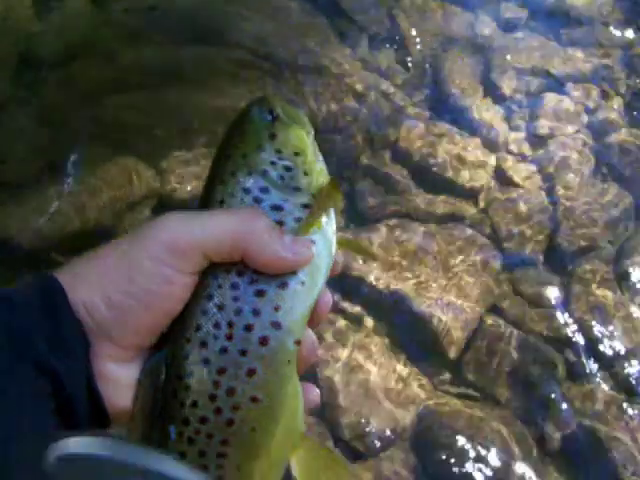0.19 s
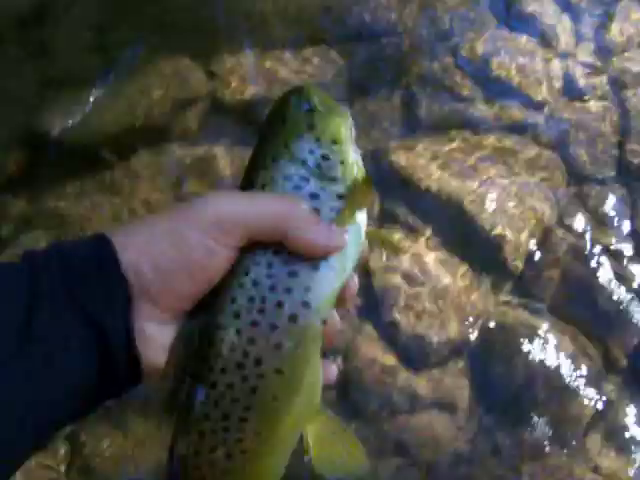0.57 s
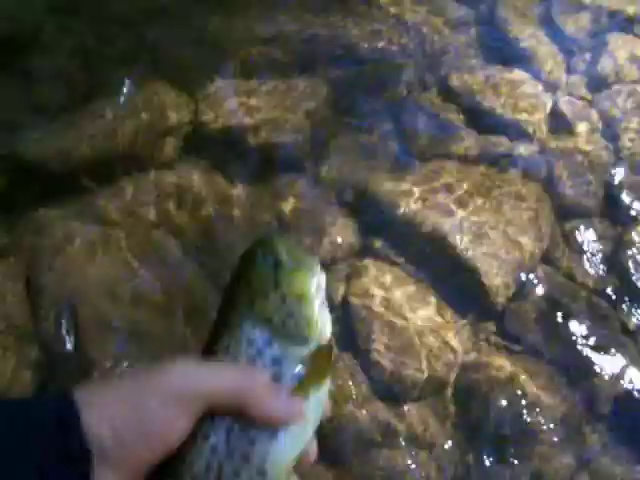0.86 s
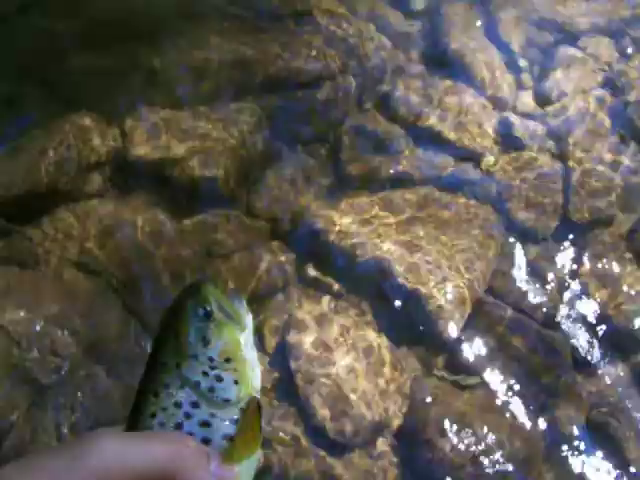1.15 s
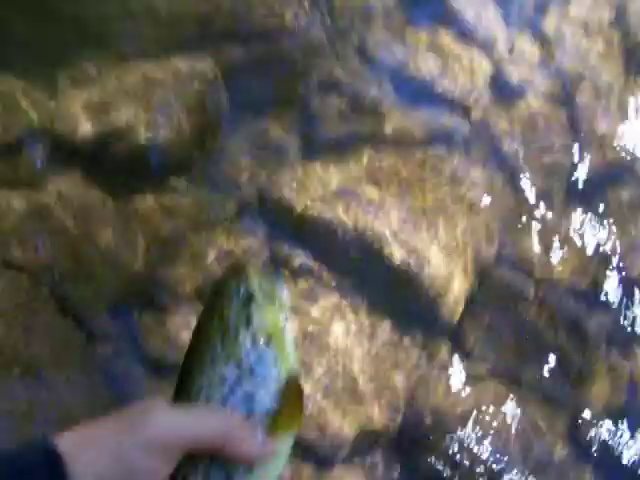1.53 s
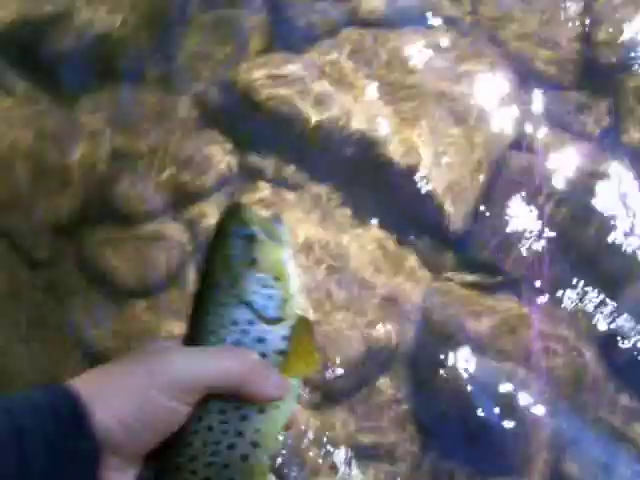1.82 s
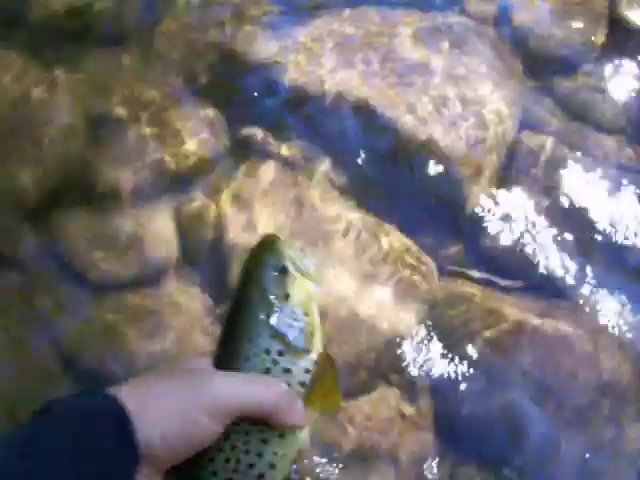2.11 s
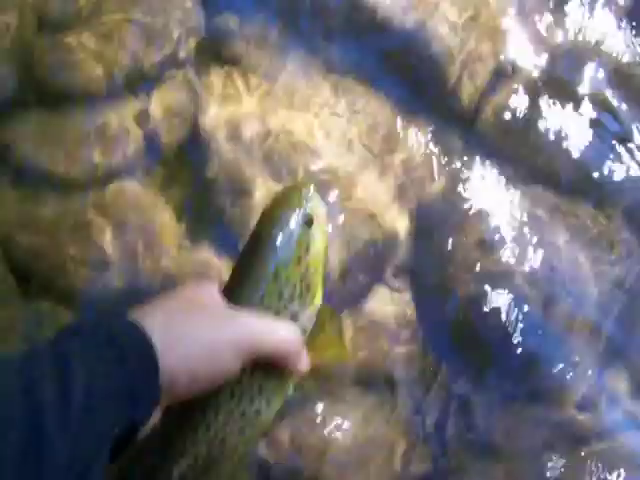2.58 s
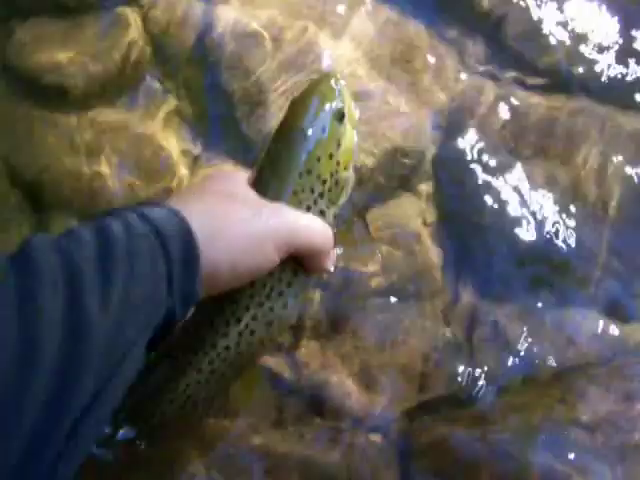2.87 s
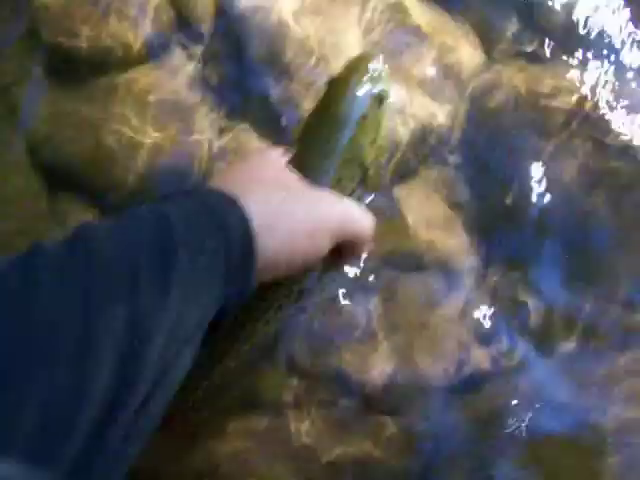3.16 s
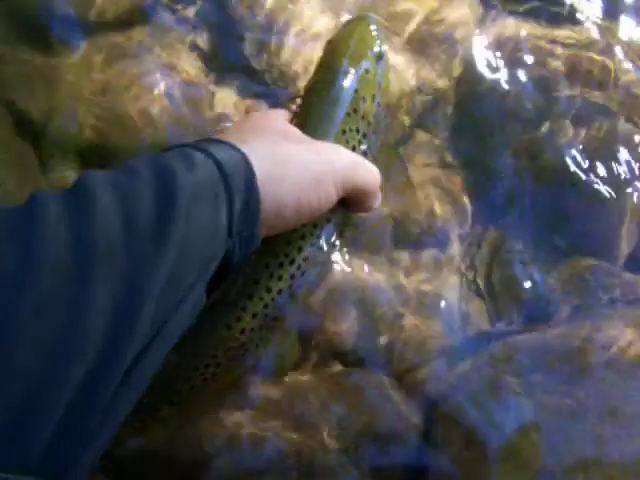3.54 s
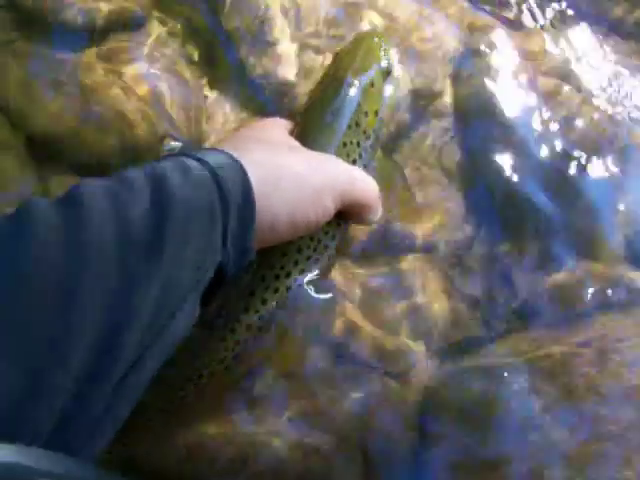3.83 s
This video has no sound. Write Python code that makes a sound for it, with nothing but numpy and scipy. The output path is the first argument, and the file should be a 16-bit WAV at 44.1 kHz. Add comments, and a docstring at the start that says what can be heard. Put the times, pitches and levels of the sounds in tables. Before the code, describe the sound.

A shallow stream fades in from about 0.4 seconds and rushes steadily over stones by 0.9, heard from just above the water. Hollow glugs and small drips sound close by between 0.5 and 1.4 seconds. The sharpest drip lands near 2.1 seconds as the gurgling grows fuller. More glugs come around 2.9 and 3.7 seconds, with faint spatter near 3.1, and the water runs on until 4 seconds.

```python
"""A shallow stream fades in, rushing over stones, heard from just above the water as a hand lowers a trout
into it. Bubbles and churning noise make the gurgle, rush and spray; pockets between the stones ring, and
drips, glugs and spatter sound close by. The echo off the surface colours the rush, rising in pitch as
the microphone sinks. A limiter ducks after the sharpest drip."""
import sys
import numpy as np
from scipy import signal
from scipy.fft import rfft, irfft, next_fast_len
from scipy.io import wavfile
from scipy.ndimage import uniform_filter1d, map_coordinates

SR = 44100
rng = np.random.default_rng(int(sys.argv[2]) if len(sys.argv) > 2 else 0)


def wav_out(sig):
    """Save sig, one row per channel (or a flat mono array), as 16-bit PCM at SR to the path in sys.argv[1]."""
    wavfile.write(sys.argv[1], SR, np.round(np.clip(np.atleast_2d(sig).T, -1, 1) * 32767).astype(np.int16))


N = 176400


def amp(db):
    """Decibels to gain."""
    return 10 ** (np.asarray(db) / 20)


def unit(x):
    """Scale to rms 1."""
    return x / np.sqrt(np.mean(x ** 2) + 1e-20)


def curves(rows):
    """Automation lanes: one value per sample for each column after the time."""
    times, *columns = np.transpose(rows)
    return [np.interp(np.arange(N) / SR, times, column) for column in columns]


def wobble(knots_per_s):
    """A smooth random drift."""
    return map_coordinates(rng.standard_normal(1024), [np.arange(N) * knots_per_s / SR], mode="wrap")


def equalise(x, points):
    """A minimum-phase EQ through (Hz, dB) points."""
    size = next_fast_len(N + SR // 2)
    hz, db = np.transpose(points)
    gain = amp(np.interp(np.log(np.fft.rfftfreq(size, 1 / SR) + 1), np.log(hz + 1), db))
    cepstrum = irfft(np.log(gain), size)
    cepstrum[1:size // 2] *= 2  # folded onto positive time, so nothing rings ahead of a hit
    cepstrum[size // 2 + 1:] = 0
    return irfft(rfft(x, size) * np.exp(rfft(cepstrum)), size)[:N]


def resonate(x, hz, width_hz):
    """A resonance applied twice, for steep sides."""
    b, a = signal.iirpeak(hz, hz / width_hz, SR)
    return unit(signal.lfilter(b, a, signal.lfilter(b, a, x)))


def add(out, start_s, sound):
    """Mix a sound in at its start time."""
    part = out[round(start_s * SR):][:len(sound)]
    part += sound[:len(part)]


def churn(patchy_db=1.5):
    """Churning water: noise whose level varies in small patches of time and frequency."""
    spectrum = signal.stft(rng.standard_normal(N), nperseg=512)[2]
    patches = uniform_filter1d(rng.standard_normal(spectrum.shape), size=5, axis=0)
    patches = uniform_filter1d(patches, size=8, axis=1)
    return unit(signal.istft(spectrum * amp(patchy_db * unit(patches)))[1][:N])


def bubble(t, hz, t60, rise):
    """Trapped air rings as a damped sine whose pitch climbs as it dies."""
    return np.sin(2 * np.pi * hz * t * (1 + rise * t / t60)) * np.exp(-np.log(1000) * t / t60)


def bubbles(low_hz, high_hz, cycles, spread_db, rise, count, samples):
    """A cloud of bubbles at random times, pitches and strengths."""
    when, pitch, strength, life = rng.random((count, 4)).T[:, :, None]
    hz = low_hz * (high_hz / low_hz) ** pitch
    gain = amp(-spread_db * np.log(np.maximum(strength, 1 / 400)))
    polarity = rng.choice([-1, 1], (count, 1))
    age = np.arange(samples)
    rings = gain * polarity * bubble(age / SR, hz, cycles * (.5 + life) / hz, rise)
    positions = (when * N).astype(int) + age
    return unit(np.bincount(positions.ravel(), rings.ravel(), N)[:N])


# The stream's mix. Each row: time in seconds, then the levels of gurgle, rush and spray in dB.
STREAM_LEVELS = [(.8, -53, -26.5, -28.5), (1.25, -43, -28.5, -27.5), (1.75, -40, -28.5, -27),
                 (2, -34, -28.5, -29), (2.55, -37.5, -28, -29), (2.9, -34.5, -29.5, -29),
                 (3.35, -34.5, -29, -29.5), (3.65, -34, -28, -30.5), (4, -36.5, -28, -28.5)]
# Round gurgle, broad rush, bright spray. Each row: frequency in Hz, gain in dB.
GURGLE_EQ = [(200, -34), (330, -5.5), (450, -4), (600, 3), (720, 1), (1100, -13), (3000, -74)]
RUSH_EQ = [(150, -42.5), (500, -3.5), (800, -1), (1050, 0), (1300, 1), (1600, -1), (2300, -1), (2900, -1),
           (4000, -6.5), (9000, -62)]
SPRAY_EQ = [(800, -37), (2200, -15), (2800, -10), (3250, -3.5), (3900, -4.5), (4400, -4.5), (4900, -8),
            (5400, -12), (6100, -14.5), (7100, -17.5), (8000, -28.5), (8700, -36.5), (9300, -73.5)]


def stream():
    """Large, middling and tiny bubbles, each on its bed of churning noise."""
    gurgle_db, rush_db, spray_db = curves(STREAM_LEVELS)
    large = bubbles(345, 853, cycles=23, spread_db=2, rise=.3, count=700, samples=4000)
    middling = bubbles(646, 3070, cycles=14.7, spread_db=1, rise=.1, count=2400, samples=1500)
    tiny = bubbles(2336, 7700, cycles=21, spread_db=2.5, rise=.023, count=5000, samples=500)
    bursts = bubbles(1570, 6500, cycles=10.5, spread_db=-2, rise=0, count=3500, samples=100)
    gurgle = unit(unit(equalise(churn(), GURGLE_EQ)) + amp(-10.5) * unit(equalise(large, GURGLE_EQ)))
    rush_bubbles = unit(equalise(middling + amp(4) * bursts, RUSH_EQ))
    rush = unit(unit(equalise(churn(), RUSH_EQ)) + amp(-2) * rush_bubbles)
    spray = unit(equalise(churn() + amp(-14) * tiny + amp(-7.5) * bursts, SPRAY_EQ))
    surge_db = .17 * wobble(35)
    return (gurgle * amp(gurgle_db + .42 * wobble(12))
            + rush * amp(rush_db + surge_db + .064 * wobble(17))
            + spray * amp(spray_db + surge_db + .29 * wobble(18)))


# The bounce off the water. Each row: time in seconds, extra path in metres.
ECHO_DETOUR = [(.8, 0.2), (1.8, 0.25), (2.6, 0.21), (3.1, 0.15), (3.9, 0.12)]


def surface_echo(x, gain=.14, sound_m_per_s=326):
    """The water mirrors the rush a moment later, hollowing some pitches and lifting others."""
    path_m, = curves(ECHO_DETOUR)
    dull = equalise(x, [(2200, 0), (4000, -23.5)])
    return x + gain * map_coordinates(dull, [np.arange(N) - path_m / sound_m_per_s * SR], order=1)


# The fizz recedes as the microphone sinks. Each row: time in seconds, level in dB.
RIFFLE_LEVEL = [(.8, -31.5), (1.25, -31), (1.5, -38), (1.8, -36.5), (2.3, -36.5), (2.9, -35.5), (3.4, -37),
                (3.8, -37)]


def riffle():
    """Tiny bubbles of about one size fizz where the water breaks over stones."""
    level_db, = curves(RIFFLE_LEVEL)
    tiny = bubbles(3030, 5000, cycles=10, spread_db=2, rise=.025, count=2500, samples=400)
    return amp(level_db) * resonate(churn() + amp(-5.5) * tiny, hz=3880, width_hz=800)


# The dull tone of deeper water. Each row: frequency in Hz, gain in dB.
DEPTHS_EQ = [(25, -30.5), (60, -17.5), (95, -17.5), (125, -8.5), (200, -1.5), (280, 1), (400, 2.5),
             (700, -16), (2000, -59)]
# Its fader. Each row: time in seconds, level in dB.
DEPTHS_FADER = [(.6, -36.5), (1.4, -40), (2.35, -37), (2.7, -39.5), (3.55, -39.5), (3.78, -36.5),
                (4, -41.5)]


def depths():
    """Large pockets of air turn over in the deeper water."""
    level_db, = curves(DEPTHS_FADER)
    large = bubbles(109, 426, cycles=11, spread_db=1.5, rise=.12, count=400, samples=5000)
    bed = unit(equalise(churn(), DEPTHS_EQ))
    return amp(level_db) * unit(bed + amp(-7) * unit(equalise(large, DEPTHS_EQ)))


def waver(x, depth=.045):
    """The pitch of a ringing pocket wanders as the water fills and empties it."""
    speed = 1 + depth * wobble(11)
    return map_coordinates(x, [np.cumsum(speed)], mode="mirror")


# Three hollows. Each row: time in seconds, then the levels of the deep, bright and small one in dB.
POCKET_LEVELS = [(.8, -40.5, -47, -45.5), (1.6, -35.5, -35, -46), (2.05, -40, -42.5, -51),
                 (2.2, -35.5, -30, -51), (2.37, -43.5, -38.5, -48), (2.57, -42, -31, -40),
                 (2.8, -39, -33.5, -35.5), (3.1, -37.5, -34.5, -33.5), (3.5, -44, -47, -34.5),
                 (4, -38, -38.5, -39.5)]


def pockets():
    """Water tumbling through gaps between the stones rings their hollows."""
    deep_db, bright_db, small_db = curves(POCKET_LEVELS)
    slaps = bubbles(292, 1700, cycles=2.6, spread_db=-.8, rise=0, count=900, samples=800)
    deep = resonate(churn() + amp(-5) * slaps, hz=418, width_hz=193)
    bright = resonate(churn() + amp(-7.5) * slaps, hz=1290, width_hz=340)
    small = resonate(churn() + amp(-2) * slaps, hz=1770, width_hz=590)
    return waver(deep) * amp(deep_db) + waver(bright) * amp(bright_db) + waver(small) * amp(small_db)


# The wet snap of pops and drips. Each row: frequency in Hz, gain in dB.
SPLAT_EQ = [(200, -19.5), (1200, -14.5), (2000, 4.5), (4200, 4.5), (5200, -18.5), (7200, -12.5),
            (9000, -54.5)]


def pops():
    """Small bubbles burst faintly on the surface close by."""
    sparse = bubbles(2000, 7000, cycles=2, spread_db=2, rise=0, count=110, samples=100)
    return equalise(amp(-43.5) * sparse, SPLAT_EQ)


# Close drips. Each row: start in seconds, level in dB, pitch in Hz, seconds to die away by 60 dB.
DRIP_CUES = [(0.497, -16, 3880, 0.034), (0.864, -12, 3800, 0.025), (1.108, -15.5, 2670, 0.03),
             (1.7835, -10, 3810, 0.013), (2.0755, 1.5, 3780, 0.0065), (2.255, -6, 2600, 0.0044)]


def drips(splat_db=-10, splat_t60_s=.022):
    """Each drop hits with a noisy splat and a brief bubble ring."""
    out, t = np.zeros(N), np.arange(SR // 4) / SR
    noise = unit(equalise(rng.standard_normal(N), SPLAT_EQ))
    for start_s, db, hz, t60 in DRIP_CUES:
        splat = noise[round(start_s * SR):][:len(t)] * np.exp(-np.log(1000) * t / splat_t60_s)
        attack = 1 - np.exp(-t * hz)
        add(out, start_s, amp(db) * attack * (bubble(t, hz, t60, rise=.085) + amp(splat_db) * splat))
    return out


# Hollow glugs. Each row: start in seconds, first bubble's level in dB, centre pitch in Hz.
GLUG_CUES = [(0.547, -13.5, 354), (0.772, -19, 357), (.82, -17, 427), (.955, -18, 386), (1.175, -26, 393),
             (1.36, -21, 375), (2.42, -36.5, 133), (2.865, -14.5, 620), (3.32, -35, 131), (3.635, -19, 517),
             (3.70, -32, 140), (3.765, -23.5, 187)]


def glugs(gap_s=.009, pitch_scatter=.09, step_db=.5, cycles=14.2):
    """Three low bubbles ring in quick succession between the stones, each a touch louder."""
    out, t = np.zeros(N), np.arange(SR // 4) / SR
    for start_s, db, centre_hz in GLUG_CUES:
        for k, hz in enumerate(centre_hz * np.exp(pitch_scatter * rng.standard_normal(3))):
            attack = 1 - np.exp(-t * hz)
            ring = attack * bubble(t, hz, cycles / hz, rise=.03)
            add(out, start_s + k * gap_s, amp(db + k * step_db) * ring)
    return out


# Fine ticks. Each row: centre time in seconds, level in dB, pitch in Hz.
SPATTER_CUES = [(1.266, -24, 4870), (1.772, -24, 4000), (3.074, -30, 5900), (3.09, -27.5, 5770),
                (3.117, -33, 5950)]


def spatter(half_width_s=.0026):
    """Fine droplets tick as tiny swells of bright, pitched noise."""
    out, t = np.zeros(N), np.arange(N) / SR
    noise = equalise(rng.standard_normal(N), [(6800, 11), (9000, -24)])
    for centre_s, db, hz in SPATTER_CUES:
        swell = np.exp(-((t - centre_s) / half_width_s) ** 2)
        out += amp(db) * swell * resonate(noise, hz, width_hz=2000)
    return out


def scene():
    """The bed of running water with the close details on top, in mono."""
    bed = surface_echo(stream()) + riffle() + depths() + pockets()
    return (bed + pops() + drips() + glugs() + spatter())[None]


def lowpass(x, hz):
    """A steep treble cut."""
    return signal.sosfilt(signal.ellip(10, .1, 80, hz, fs=SR, output="sos"), x)


def limiter(x, threshold_db=-6, release_s=.038):
    """The gain ducks just after a peak and quickly recovers."""
    over_db = np.maximum(20 * np.log10(np.abs(x) + 1e-9) - threshold_db, 0)
    release = np.exp(np.arange(N) / SR / release_s)
    duck_db = np.maximum.accumulate(over_db * release) / release
    attack = np.hanning(64)
    return x * amp(-signal.lfilter(attack / attack.sum(), 1, duck_db))


# The master fade-in. Each row: time in seconds, gain in dB.
FADE_IN = [(.37, -27.5), (.5, -18.5), (.6, -12), (.72, -6), (.8, 0), (.86, 2)]


def record(dry, clip_db=-4.5, start_s=.3725):
    """A narrow-band microphone, a limiter, clipping, a fade-in from silence and a softened top end."""
    limited = limiter(lowpass(dry[0], hz=9100))
    clipped = np.clip(limited, -amp(clip_db), amp(clip_db))
    fade_db, = curves(FADE_IN)
    faded = clipped * amp(fade_db) * (np.arange(N) / SR > start_s)
    softened = equalise(faded, [(8000, 0), (9800, -11)])
    return lowpass(softened, hz=16000)[None]


dry = scene()
out = record(dry)
wav_out(out)
```